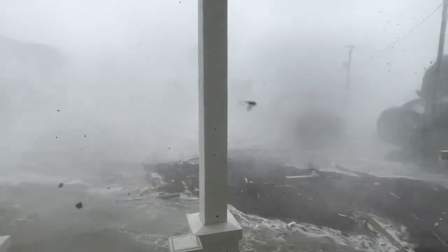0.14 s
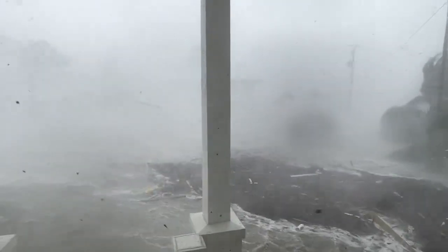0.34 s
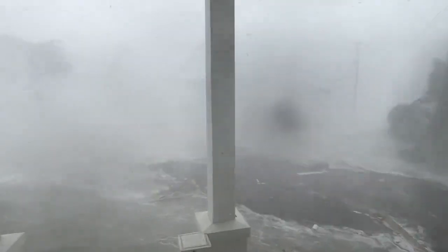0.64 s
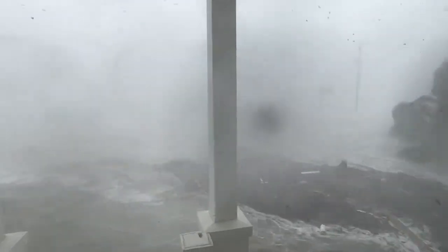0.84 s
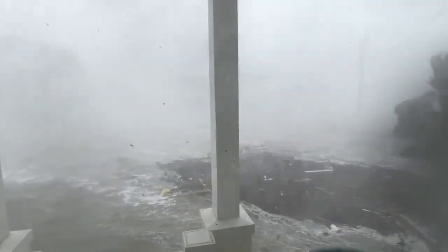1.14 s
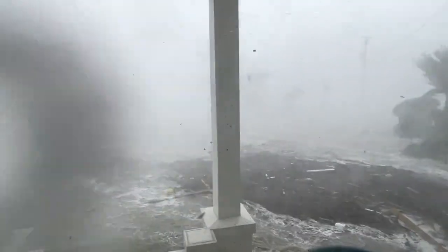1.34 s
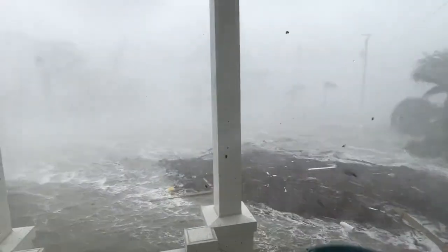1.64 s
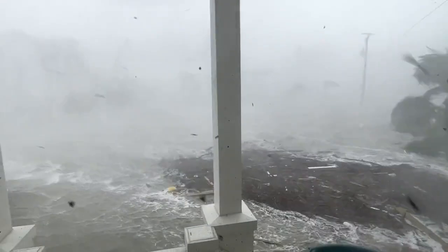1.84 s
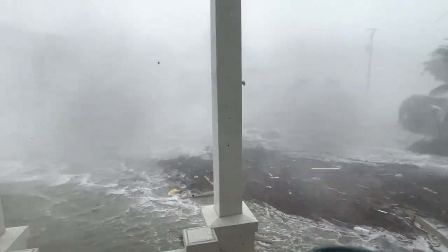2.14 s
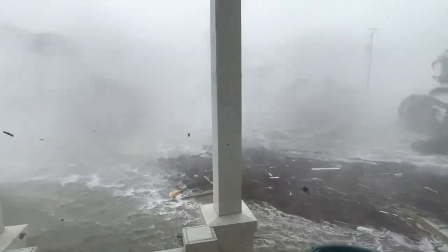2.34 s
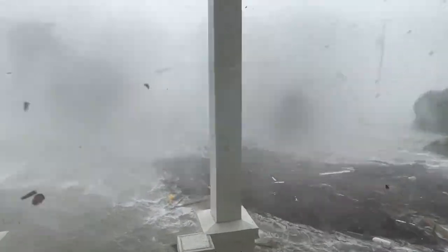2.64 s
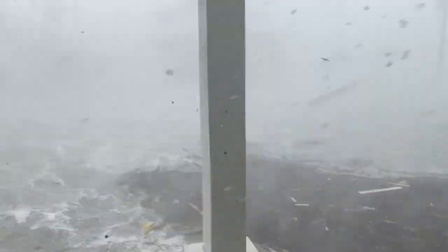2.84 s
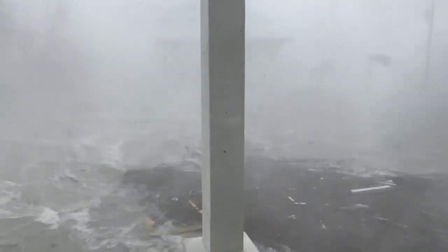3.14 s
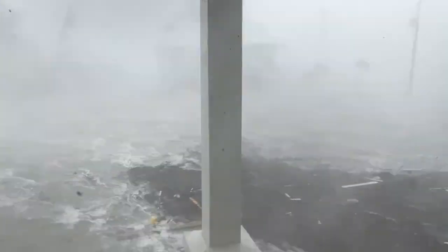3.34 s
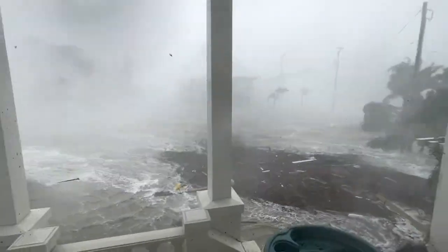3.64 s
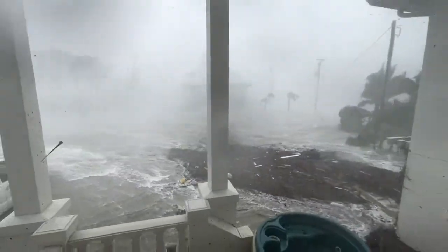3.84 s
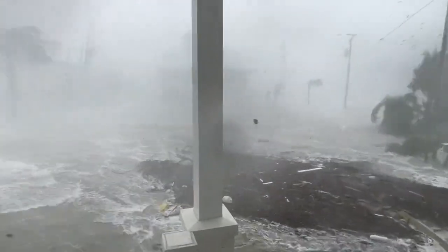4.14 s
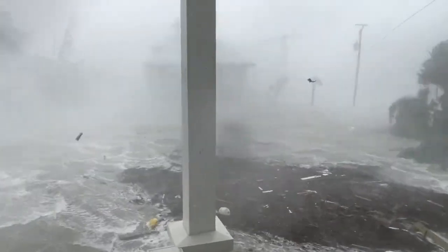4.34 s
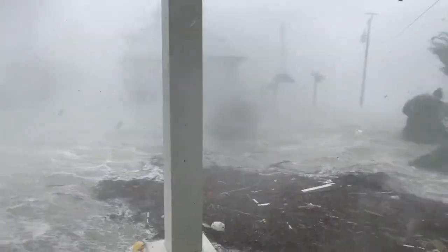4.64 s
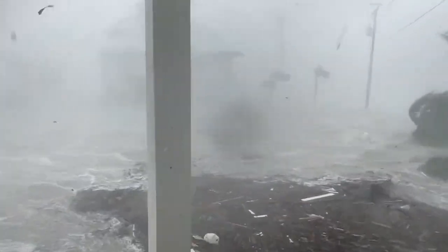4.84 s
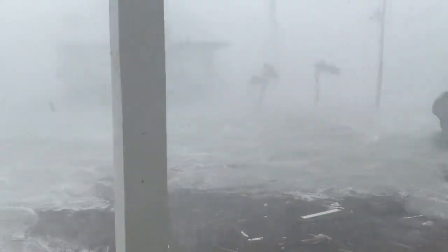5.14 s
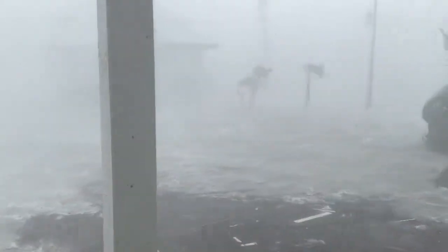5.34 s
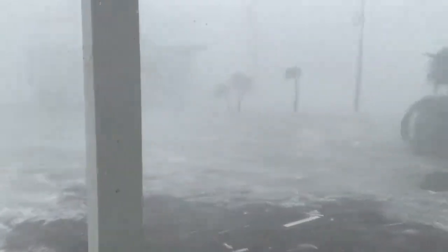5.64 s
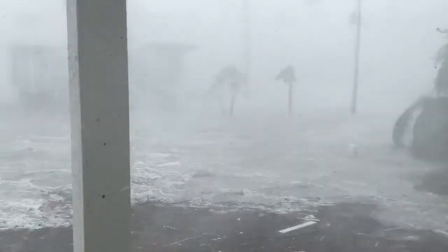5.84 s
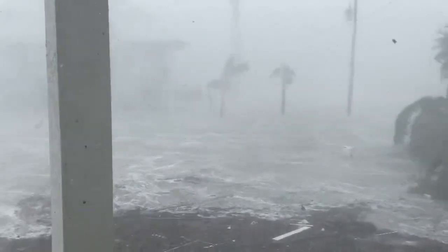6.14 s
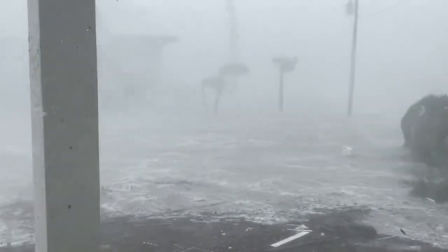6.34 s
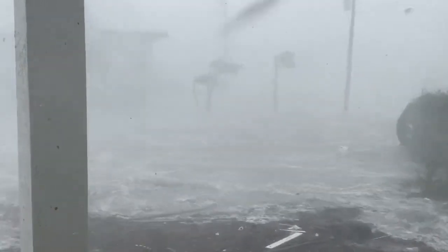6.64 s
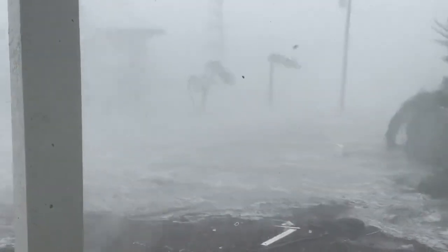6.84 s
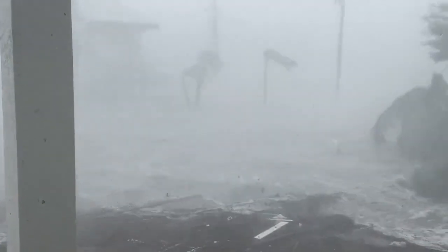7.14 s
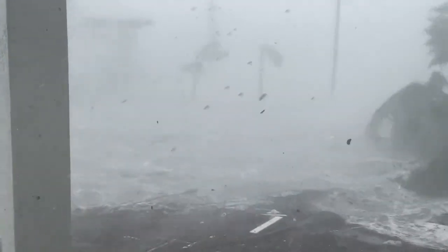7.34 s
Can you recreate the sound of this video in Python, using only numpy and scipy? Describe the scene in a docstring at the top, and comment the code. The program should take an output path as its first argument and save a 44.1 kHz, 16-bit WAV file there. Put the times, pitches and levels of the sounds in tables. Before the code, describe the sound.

Very close, wide stereo wind noise: ragged bass flaps, low flutter and midrange rush, with a brief low drone and hoots early on. Hard irregular ticks and casing thumps from driven water and grit crowd the first four seconds over hissing spray. The gusts then fall away, leaving distant storm and surf, before sparser blows and clusters of ticks resume.

```python
"""Hurricane wind buffets the microphone ports of a hand-held camera on a porch: flapping bass, rushing mids, hoots.
Spray hisses over it; driven drops and grit strike: sharp ticks, the heavier ones sweeping down into a thump.
Once a piece of debris knocks. In a lull near five seconds the far roar of wind and surf, with a faint whistle,
stands almost alone. Wind, spray and roar are shaped noise; drops are built as spectra and dispersed into falling
chirps; hoots and the knock are decaying sines."""
import sys
import numpy as np
from scipy import signal
from scipy.fft import rfft, irfft, next_fast_len
from scipy.io import wavfile
from scipy.ndimage import uniform_filter1d, map_coordinates

SR = 44100
rng = np.random.default_rng(int(sys.argv[2]) if len(sys.argv) > 2 else 0)


def pcm_store(signal):
    """Save signal as 16-bit PCM."""
    levels = np.round(np.clip(np.atleast_2d(signal), -1, 1) * 32767)
    wavfile.write(sys.argv[1], SR, levels.astype(np.int16).T)


N = 330750


def amp(db):
    """Decibels to gain."""
    return 10 ** (np.asarray(db) / 20)


def unit(x):
    """Scale to rms 1."""
    return x / np.sqrt(np.mean(x ** 2) + 1e-20)


def along(points, hz):
    """Read a table of (frequency_hz, value) points on a log frequency axis."""
    f, v = np.transpose(points)
    return np.interp(np.log(hz + 1), np.log(f + 1), v)


def curves(rows):
    """One value per sample for each column after the time."""
    s, *cols = np.transpose(rows)
    return [np.interp(np.arange(N) / SR, s, c) for c in cols]


def wobble(rate):
    """A smooth random curve, rate knots a second."""
    knots = rng.standard_normal(int(N * rate / SR) + 4)
    return map_coordinates(knots, [np.arange(N) * rate / SR])


def filtered(x, response):
    """x times a complex response of frequency."""
    size = next_fast_len(N + SR // 2)
    hz = np.fft.rfftfreq(size, 1 / SR)
    return irfft(rfft(x, size) * response(hz), size)[..., :N]


def add(track, s, sound):
    """Mix a sound into a track from time s on."""
    part = track[..., max(round(s * SR), 0):]
    part[..., :sound.shape[-1]] += sound[..., :part.shape[-1]]


def sweep(hz, cycles):
    """Dispersion: each frequency arrives some cycles late, so a blow becomes a falling chirp."""
    return np.exp(-2j * np.pi * cycles * np.log(hz + 1))


# how alike close sounds are left and right: frequency_hz, likeness (0 to 1)
CLOSE_LIKENESS = [(60, 1), (300, 0.67), (700, 0.58), (1000, 0.26), (1400, 0.083), (2200, 0.033),
                  (3500, 0.17), (12000, 0.093)]


def pair(x, spectrum, alike=CLOSE_LIKENESS):
    """Two unrelated signals become a coloured, partly alike stereo pair of rms 1."""
    def response(hz):
        turn = np.arccos(np.clip(along(alike, hz), -1, 1)) / 2
        colour = amp(along(spectrum, hz)) * sweep(hz, cycles=1.7)
        return colour * [np.cos(turn), np.sin(turn)]

    mid, side = filtered(x, response)
    return unit(np.array([mid + side, mid - side]))


def noise():
    """Two unrelated white noises."""
    return rng.standard_normal((2, N))


def patter(rate, spread_db):
    """Two trains of random tiny blows of uneven size, each with rate blows a second; rms 1."""
    chance = rng.random((2, N))
    size = np.clip(noise(), -2, 2)
    return unit((chance < rate / SR) * amp(spread_db * size) * np.sign(noise()))


def even(x):
    """Rms 1 over about a tenth of a second: quick blows stay, slow swells go."""
    power = uniform_filter1d(np.mean(x ** 2, axis=0), SR // 14)
    power = uniform_filter1d(power, SR // 20)
    return x / np.sqrt(np.abs(power) + 1e-9)


def patchy(x, depth_db):
    """Narrow bands lift and dip at random for a few hundredths of a second."""
    z = signal.stft(x, nperseg=1024)[2]
    field = uniform_filter1d(rng.standard_normal(z.shape[1:]), size=4, axis=0)
    field = uniform_filter1d(field, size=4, axis=1)
    return signal.istft(z * amp(depth_db * unit(field)), nperseg=1024)[1][:, :N]


# strength of the steady wind over time: time_s, strength_db
WIND_STRENGTH = [(0.0, -19.5), (0.2, -27.5), (0.26, -30.5), (0.54, -30), (0.66, -25), (1.18, -21.5),
                 (1.22, -31), (1.5, -14), (1.6, -30), (1.8, -20.5), (2.02, -20.5), (2.8, -25.5),
                 (2.87, -32.5), (2.97, -23.5), (3.92, -25), (4.77, -33.5), (4.85, -49), (5.71, -50.5),
                 (5.8, -24.5), (6.38, -36.5), (6.68, -31), (7.3, -38), (7.5, -26.5)]
REFERENCE_WIND_DB = -22.5


def winds():
    """The steady wind in dB over its reference strength."""
    return curves(WIND_STRENGTH)[0] - REFERENCE_WIND_DB


# single gusts: centre_s, length_s, push_db, extra_bass_db, spray_carried_db
GUST_EVENTS = [(0.126, 0.16, -27.5, 4, -68), (0.464, 0.026, -21.5, -10, -45),
               (0.631, 0.07, -23.5, -2.5, -47), (0.79, 0.11, -22.5, -7, -45.5), (1.07, 0.12, -20, -14, -42),
               (1.421, 0.098, -21.5, 7, -46.5), (1.506, 0.071, -21.5, -4, -43.5),
               (1.839, 0.03, -21.5, 8, -43), (2.792, 0.037, -21.5, -7, -47), (3.248, 0.12, -25.5, 3, -46),
               (3.543, 0.092, -25.5, 11.5, -47.5), (3.914, 0.13, -25.5, 12, -46.5),
               (4.211, 0.044, -21.5, 5, -61), (5.298, 0.018, -25.5, -5.5, -50),
               (5.328, 0.056, -33, -9, -59.5), (6.018, 0.022, -23.5, -22, -39.5),
               (6.855, 0.061, -28, 6, -62.5)]


def swells(levels_db):
    """Power of the gusts: each rises and falls as a bell, to its own level."""
    t = np.arange(N) / SR
    power = 0
    for (s, length, *_), db in zip(GUST_EVENTS, levels_db):
        bell = np.exp(-np.minimum((2 * (t - s) / length) ** 2, 60))
        power = power + amp(2 * db) * bell
    return power


# colour of the bass flaps: frequency_hz, relative_level_db (per Hz)
BUFFET_COLOUR = [(20, -37), (30, -31), (45, -0.5), (70, 8.5), (110, 4), (160, 0), (230, -10.5),
                 (450, -69.5)]
# colour of the low-mid flutter: frequency_hz, relative_level_db (per Hz)
FLUTTER_COLOUR = [(90, -14), (170, -4), (240, 2), (340, 0.5), (480, -9), (700, -4), (1500, -85)]
# colour of the midrange rush, also worn by the wet splat around each tick: frequency_hz, relative_level_db (per Hz)
RUSH_COLOUR = [(250, -30), (480, -1.5), (750, 0.5), (1000, -2), (1300, -4.5), (1650, -8.5), (2000, -15.5),
               (2600, -26), (5000, -56), (10000, -85)]
# each layer's level at the reference wind (dB), dB gained per dB of wind, level in a gust (dB re its push)
BUFFET_DB, BUFFET_GROWS, BUFFET_GUST_DB = -22, 1.14, -2.5
FLUTTER_DB, FLUTTER_GROWS, FLUTTER_GUST_DB = -25.5, 0.88, 4
RUSH_DB, RUSH_GROWS, RUSH_GUST_DB = -28, 0.83, -0.5


def gusts():
    """Eddies hit the ports: separate flaps in the bass, a patter of small blows higher up; all grow with wind and gusts."""
    wind_db = winds()
    push_db, extra_bass_db = np.transpose(GUST_EVENTS)[2:4]
    push, heavy_push = swells(push_db), swells(push_db + extra_bass_db)

    def level(steady_db, gust, gust_db):
        return np.hypot(amp(steady_db), amp(gust_db) * np.sqrt(gust))

    eddies = wobble(28)
    flaps = .3 * noise() + patter(50, spread_db=2.5)
    slaps = .3 * noise() + patter(90, spread_db=4)
    grain = patchy(.6 * noise() + patter(240, spread_db=5), depth_db=3.5)

    buffet = even(amp(2 * eddies) * pair(flaps, BUFFET_COLOUR))
    buffet = buffet * level(BUFFET_DB + BUFFET_GROWS * wind_db, heavy_push, BUFFET_GUST_DB)
    flutter = even(amp(2.3 * eddies) * pair(slaps, FLUTTER_COLOUR))
    flutter = flutter * level(FLUTTER_DB + FLUTTER_GROWS * wind_db, push, FLUTTER_GUST_DB)
    rush = even(amp(2.3 * eddies) * pair(grain, RUSH_COLOUR))
    rush = rush * level(RUSH_DB + RUSH_GROWS * wind_db, push, RUSH_GUST_DB)
    return amp(2.96 * wobble(14)) * (buffet + flutter) + rush


# level is at the reference wind
DRONE_HZ, DRONE_WIDTH_HZ, DRONE_DB, DRONE_UNTIL_S = 239, 7.8, -27.5, 1.3


def drone():
    """A narrow low drone, the same in both channels, wavers with the wind and fades after 1.3 s."""
    narrow = lambda hz: 1 / (1 + ((hz - DRONE_HZ) / DRONE_WIDTH_HZ) ** 4)
    fade = 1 / (1 + (np.arange(N) / SR / DRONE_UNTIL_S) ** 20)
    return amp(DRONE_DB + winds()) * fade * unit(filtered(noise()[0], narrow))


# phase turn of the wind's low rumble at the left: frequency_hz, phase_rad
BASS_PHASE = [(80, 0), (130, -.6), (200, -2.3), (300, -4.8), (400, -6.28)]


def widen_bass(x):
    """The wind's low rumble is turned in phase at the left, giving a wide bass."""
    return filtered(x, lambda hz: np.exp(1j * np.outer([1, 0], along(BASS_PHASE, hz))))


# fine spray, until the lull: time_s, relative_level_db
SPRAY_LEVEL = [(0.0, -52.5), (1.55, -50), (1.62, -55.5), (1.74, -48.5), (2.26, -45), (2.36, -59.5),
               (2.47, -47), (2.8, -45.5), (2.85, -54), (2.93, -48), (4.24, -47), (4.36, -58.5), (4.5, -53),
               (4.6, -57), (4.71, -51), (4.81, -54), (4.84, -76)]
# colour of spray and droplets: frequency_hz, relative_level_db (per Hz)
HISS_COLOUR = [(900, -17), (2200, -7.5), (3300, 2), (4500, -2.5), (6500, -17), (8300, -28), (10300, -54),
               (12500, -38), (15000, -38)]
WISPS_S, WISP_HALF_S, WISP_DB = [4.887, 4.955, 5.578], 0.0075, -59.5  # thin wisps in the lull
# the short hiss around each tick: rise, decay, hiss level, and level of its wet midrange body
SPLASH_RISE_S, SPLASH_DECAY_S, SPLASH_DB, SPLAT_DB = .004, .006, -33, -12.5
# droplets between the big drops: blows a second, spread of sizes, level over the spray
STRAY_RATE, STRAY_SPREAD_DB, STRAY_DB = 55, 6.5, -1.5


def spray():
    """Fine spray hisses and swells with each gust; stray droplets crackle; a short hiss swells and fades around each tick."""
    spray_db, = curves(SPRAY_LEVEL)
    t = np.arange(N) / SR
    wisps = sum(np.exp(-np.minimum(((t - s) / WISP_HALF_S) ** 2, 60)) for s in WISPS_S)
    gust_spray = swells(np.transpose(GUST_EVENTS)[4])
    wet = np.sqrt(amp(2 * spray_db) + gust_spray + amp(2 * WISP_DB) * wisps)

    times, tick_db = np.transpose(ticks())
    blows = np.bincount(np.round(times * SR).astype(int), amp(tick_db), N)
    lag = np.arange(-SR // 8, SR // 8) / SR
    swell_and_fade = np.exp(np.minimum(lag / SPLASH_RISE_S, -lag / SPLASH_DECAY_S))
    splash = signal.fftconvolve(blows, swell_and_fade, "same")
    splat = amp(SPLAT_DB + winds() / 2) * splash * pair(noise(), RUSH_COLOUR)

    level = amp(1.0) * wet + amp(SPLASH_DB) * splash
    grainy_noise = noise() + 0.7 * patter(900, spread_db=5.0)
    mist = level * amp(2.1 * wobble(16)) * pair(grainy_noise, HISS_COLOUR)
    # stray droplets are loud in the spray and faint in the lull
    stray_level = amp(STRAY_DB) * wet + amp(-66 + winds())
    strays = stray_level * pair(patter(STRAY_RATE, spread_db=STRAY_SPREAD_DB), HISS_COLOUR)
    return mist + splat + strays


# colour of the far storm: frequency_hz, relative_level_db (per Hz)
ROAR_COLOUR = [(30, -11.5), (70, 7.5), (300, 5.5), (450, 0.5), (700, 0), (950, 4), (1250, -7.5),
               (1700, -11), (2200, -35), (3200, -33.5), (4400, -49.5), (9000, -69.5)]
# left-right likeness of the far roar: frequency_hz, likeness (0 to 1)
ROAR_LIKENESS = [(100, 0.68), (450, 0.17), (1000, 0.86), (1700, 0.95), (2200, 0.24), (4000, 0.32)]


def far_roar():
    """Wind and surf far off as slowly wavering noise, with a whistle from wires or an edge, a little to the left."""
    body = amp(-38 + 2.5 * wobble(3.6)) * pair(noise(), ROAR_COLOUR, ROAR_LIKENESS)
    whistle_hz, left_db = 1650, 2  # left raised and right lowered by left_db
    narrow = lambda hz: 1 / (1 + ((hz - whistle_hz) / 110) ** 2)
    whistle = amp(-54.0 + 0.43 * wobble(2.7)) * unit(filtered(noise()[0], narrow))
    return body + amp([[left_db], [-left_db]]) * whistle


# gusts that make a port hoot: start_s, pitch_hz, level_db, rise_s, t60_s, left_minus_right_db
HOOT_EVENTS = [(.098, 229, -8, .012, .16, -6), (1.301, 230, -5, .005, .3, -5),
               (2.345, 905, -9, .002, .03, 6)]


def hoots():
    """Air blown across a port rings its cavity briefly; the pitch wavers."""
    track, t = np.zeros((2, N)), np.arange(SR // 6) / SR
    for s, hz, db, rise, t60, pan_db in HOOT_EVENTS:
        wavering_hz = hz * (1 + .07 * wobble(300)[:len(t)])
        phase = 2 * np.pi * np.cumsum(wavering_hz) / SR
        swell = amp(db - 60 * t / t60) * (1 - np.exp(-t / rise))
        swell = swell / (1 + (t / 0.059) ** 8)  # the hoot is cut off near 0.06 s
        pan = amp([[pan_db / 2], [-pan_db / 2]])
        add(track, s, swell * pan * np.sin(phase + np.array([[0], [2.1]])))
    return track


# width of a thump: octaves below its pitch; above it, a share of the octaves up to the casing's top; the low cut
THUMP_BELOW, THUMP_SPREAD, THUMP_TOP_HZ, LOW_CUT_HZ = 0.99, 0.32, 2070, 38


def thump(hz, thump_db, thump_hz):
    """Spectrum of the casing's thump: a deeper one spreads wider, so it slides down into a long low tail."""
    octaves = np.log2((hz + 1) / thump_hz)
    above = THUMP_SPREAD * np.log2(THUMP_TOP_HZ / thump_hz)
    bump = np.exp(-.5 * (octaves / np.where(octaves < 0, THUMP_BELOW, above)) ** 2)
    bump = bump / (1 + (LOW_CUT_HZ / (hz + 1)) ** 6)
    return amp(thump_db - 0.5) * bump / bump.mean()


# colour of a tick: frequency_hz, relative_level_db
TICK_COLOUR = [(250, -10.5), (700, -0.5), (1600, 4.5), (2500, -3.5), (3300, -3.5), (5000, -7.5),
               (7000, -11.5), (10000, -18.5), (12500, -24.5), (15000, -20)]
TICK_BRIGHTENS, TYPICAL_TICK_DB = 0.27, -10  # dB per octave gained for each dB over the typical level


def tick(hz, tick_db):
    """Spectrum of a snap, brighter when harder; each gets a random colour, mostly shared by both sides."""
    # a few short random echoes comb the spectrum
    delays = rng.exponential(0.000609, (4, 1, 1))
    shares = 0.48 * rng.standard_normal((4, 1, 1)) + 0.23 * rng.standard_normal((4, 2, 1))
    comb = 1 + np.sum(shares * np.exp(-2j * np.pi * hz * delays), axis=0)
    comb = comb / np.abs(comb).mean()
    slope_db = TICK_BRIGHTENS * (tick_db - TYPICAL_TICK_DB) + .8 * rng.standard_normal()
    colour = amp(along(TICK_COLOUR, hz) + slope_db * np.log2((hz + 200) / 4000))
    side_level = amp(tick_db + 10.5 + rng.standard_normal((2, 1)))
    return side_level * colour / colour.mean() * comb


# drops heavy enough to thump the camera: time_s, relative_tick_db, relative_thump_db, thump_hz
HEAVY_DROPS = [(0.4614, -17.5, -3.5, 270), (0.627, -11, -10.5, 236), (0.8128, -11.5, 1.5, 287),
               (1.021, -17, -8.5, 236), (1.108, -11.5, -4.5, 362), (1.2997, -11.5, 2.5, 298),
               (1.388, -15, -2, 337), (1.4826, -9, -9.5, 450), (1.858, -11, -9.5, 211),
               (2.151, -17, -5.5, 265), (2.2472, -10.5, -6, 240), (2.4699, -12, -9, 340),
               (2.5507, -15, -5, 310), (2.6758, -16, -4, 348), (2.9741, -14, -5.5, 339),
               (3.167, -10.5, -6, 213), (3.325, -18.5, -2, 279), (3.416, -8, -6.5, 283),
               (3.4925, -16, 1, 374), (3.53, -13.5, 3.5, 297), (3.567, -18.5, -6, 320),
               (3.6415, -8, -8.5, 297), (3.7824, -11.5, -2, 194), (3.8015, -14.5, 0.5, 294),
               (3.8564, -14, -9.5, 239), (3.9144, -9.5, -3, 287), (4.0204, -9, -5.5, 234),
               (4.2042, -15, -8.5, 476), (4.7958, -14.5, 5, 101), (5.3083, -18, -9.5, 277),
               (6.003, -15.5, -7, 339), (6.0218, -8, -4.5, 352), (6.2354, -21.5, -0.5, 321),
               (6.491, -15.5, -9.5, 330), (6.5358, -11, -3.5, 331), (6.601, -26, -4, 290),
               (6.6314, -12, 6.5, 170), (7.1193, -12.5, 4, 339)]
# flying grit and small drops, too light to thump: time_s, relative_tick_db
LIGHT_GRIT = [(0.453, -21), (0.566, -24.5), (0.776, -11), (0.794, -12), (1.115, -15), (1.3616, -8.5),
              (1.5218, -18.5), (1.7133, -19.5), (2.219, -15), (2.765, -18), (2.792, -20.5), (2.9292, -15.5),
              (2.947, -20), (3.0354, -23), (3.1906, -14), (3.209, -17.5), (3.321, -15), (3.384, -12),
              (3.4792, -8.5), (3.5505, -13), (3.5923, -16.5), (3.718, -17), (4.492, -25.5), (5.2783, -29),
              (5.637, -35.5), (5.765, -22), (5.788, -28), (5.8876, -19), (5.9036, -16), (5.9267, -14),
              (5.95, -25.5), (6.056, -31), (6.0897, -30.5), (6.257, -29), (6.56, -25), (6.597, -27),
              (6.8274, -15.5), (6.835, -11.5), (6.87, -23.5), (6.903, -31), (7.2328, -28.5), (7.2595, -31),
              (7.4704, -35.5)]


def ticks():
    """Time and tick level of every drop and piece of grit."""
    return [row[:2] for row in HEAVY_DROPS] + LIGHT_GRIT


# slaps of air that thump the casing without a tick: time_s, relative_thump_db, thump_hz
AIR_SLAPS = [(0.659, -4.5, 302), (0.9118, -1.5, 305), (1.152, -2, 67), (1.365, -0.5, 64.5),
             (1.495, -7, 69.4), (1.99, -2.5, 75.3), (2.02, -1, 267), (2.103, -5, 234), (2.806, -6, 103),
             (3.412, -3.5, 69), (3.872, 0, 186), (3.898, -6, 65), (4.113, -5, 234), (4.56, -4, 203),
             (5.838, -5.5, 128), (6.151, -10.5, 277), (7.3034, -8, 223)]
# smaller pieces landing around each hit: soonest_s, latest_s, level_db (re the hit)
HIT_FRAGMENTS = [(-.007, .006, -14), (-.018, .028, -17)]


def drops():
    """Drops snap and sweep down into the casing's thump; grit only ticks, air slaps only thump; fragments land close by."""
    size, lead = 2 ** 12, .005  # lead in s: room before the blow
    hz = np.fft.rfftfreq(size, 1 / SR)
    blows = []
    for s, tick_db, thump_db, thump_hz in HEAVY_DROPS:
        blows.append((s, tick(hz, tick_db) + thump(hz, thump_db, thump_hz)))
    for s, tick_db in LIGHT_GRIT:
        blows.append((s, tick(hz, tick_db)))
    for s, thump_db, thump_hz in AIR_SLAPS:
        blows.append((s, thump(hz, thump_db, thump_hz)))
    for s, tick_db in ticks():
        for soonest, latest, db in HIT_FRAGMENTS:
            blows.append((s + rng.uniform(soonest, latest), tick(hz, tick_db + db)))

    track = np.zeros((2, N))
    for s, spectrum in blows:
        chirp = sweep(hz, cycles=1.7 + 0.1 * rng.standard_normal())
        delay = np.exp(-2j * np.pi * hz * lead)
        add(track, s - lead, irfft(spectrum * chirp * delay))
    return track


# what the debris rings with: pitch_hz, level_db, t60_s
KNOCK_RINGING = [(430, 6, .014), (880, 14, .008), (1450, 10, .006)]
KNOCK_S, KNOCK_RISE_S, KNOCK_PAN_DB = 2.8052, 0.0016, 3  # start, softness of the contact, left minus right


def knock():
    """A hollow, woody knock of debris: a few quickly dying modes, a quarter cycle later at the right."""
    track, t = np.zeros((2, N)), np.arange(SR // 10) / SR
    lag = np.array([[0], [np.pi / 2]])
    ring = sum(amp(db - 60 * t / t60) * np.sin(2 * np.pi * hz * t - lag) for hz, db, t60 in KNOCK_RINGING)
    pan = amp([[KNOCK_PAN_DB / 2], [-KNOCK_PAN_DB / 2]])
    add(track, KNOCK_S, ring * (1 - np.exp(-t / KNOCK_RISE_S)) * pan)
    return track


# fixed phase of left against right, negative is late: frequency_hz, phase_rad
STEREO_PHASE = [(50, -.1), (200, -1), (400, -.9), (600, -3), (1000, -4), (1500, -5.1), (2200, -6.1),
                (2800, -11.4), (4500, -13.4), (6300, -13.5), (10000, -15.7), (13000, -18.7)]
# difference in colour, scaled by each sound's share: frequency_hz, left_minus_right_db
STEREO_TILT = [(60, -3), (230, -4.5), (400, -1), (750, 4.5), (1200, -2), (3000, -3), (12000, 0)]


def stereo_difference(x, tilt):
    """Left and right differ by a fixed phase curve, left late, and in colour; tilt is the share of that colour."""
    def response(hz):
        half = amp(tilt * along(STEREO_TILT, hz) / 2)
        return np.array([half * np.exp(1j * along(STEREO_PHASE, hz)), 1 / half])

    return filtered(x, response)


def scene():
    """Wind, spray and drops are close by and spread in stereo; the storm roars behind them."""
    wind_and_spray = stereo_difference(widen_bass(gusts() + drone()) + spray(), tilt=0.54)
    hits = stereo_difference(drops(), tilt=0.97)
    return wind_and_spray + hits + hoots() + knock() + far_roar()


TOP_HZ = 16200


def record(dry):
    """The camera rounds off the highest peaks and keeps almost nothing above its band limit."""
    rounded = dry / (1 + np.abs(dry / .92) ** 6) ** (1 / 6)
    return filtered(rounded, lambda hz: 1 / (1 + (hz / TOP_HZ) ** 120))


dry = scene()
out = record(dry)
pcm_store(out)
```